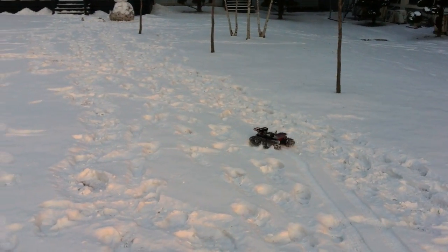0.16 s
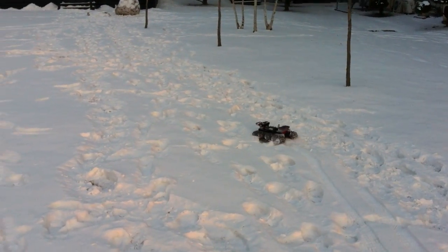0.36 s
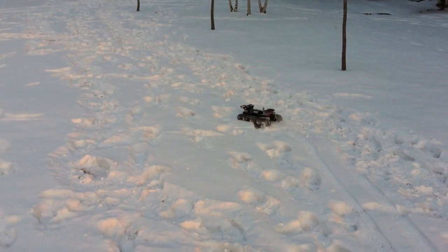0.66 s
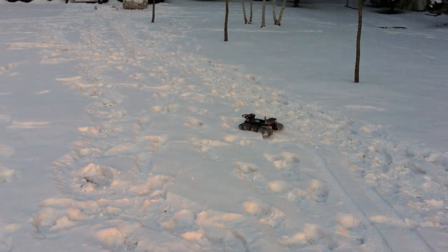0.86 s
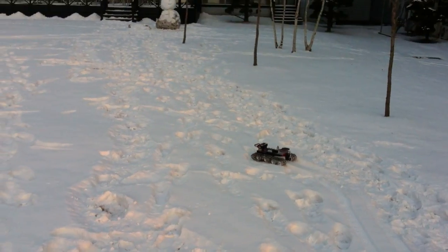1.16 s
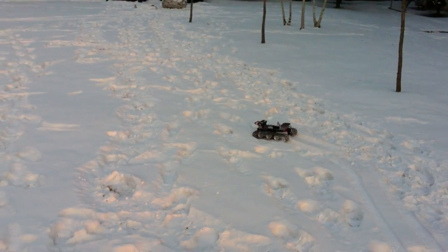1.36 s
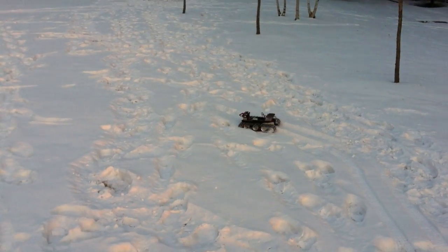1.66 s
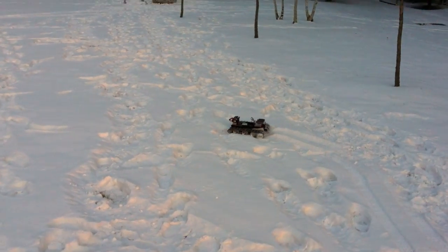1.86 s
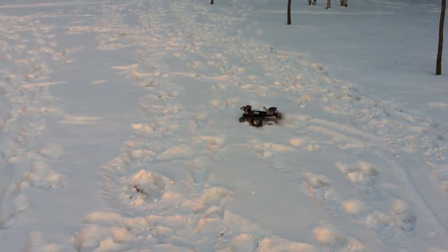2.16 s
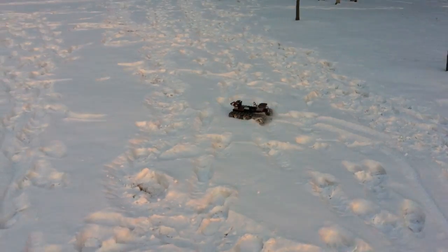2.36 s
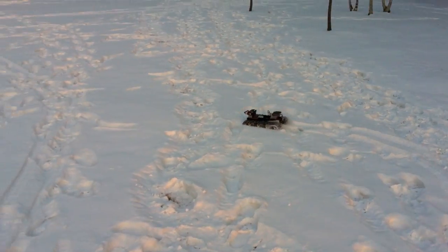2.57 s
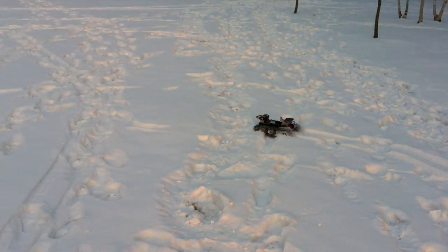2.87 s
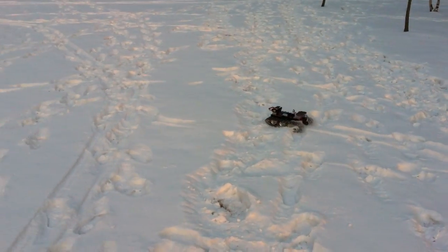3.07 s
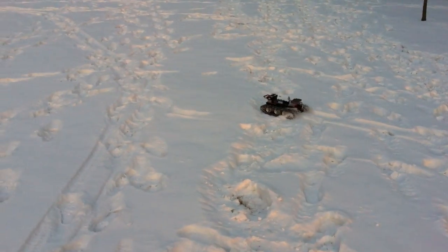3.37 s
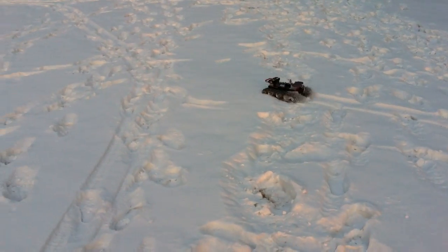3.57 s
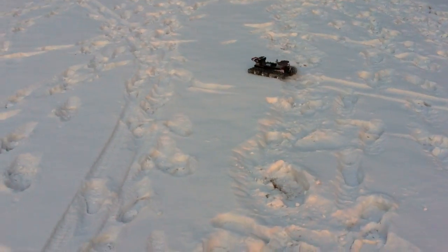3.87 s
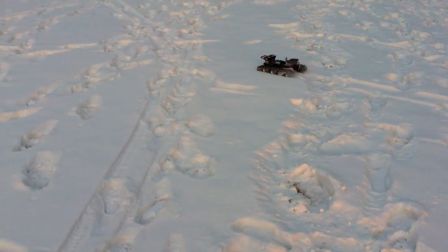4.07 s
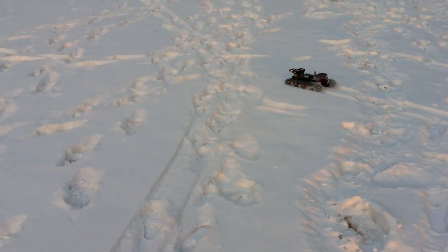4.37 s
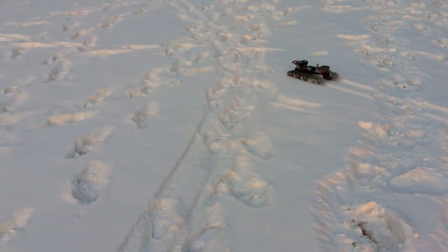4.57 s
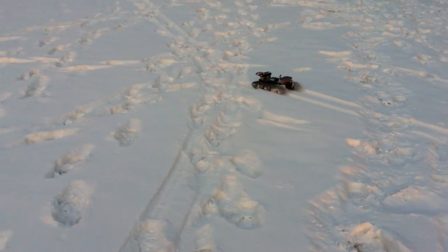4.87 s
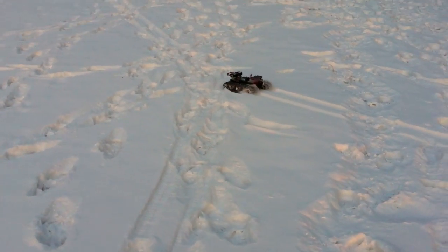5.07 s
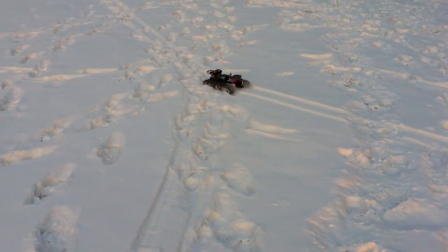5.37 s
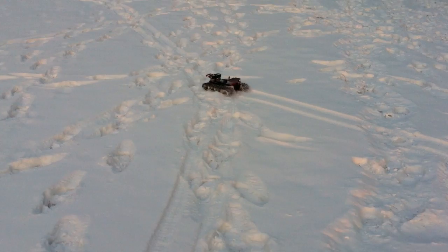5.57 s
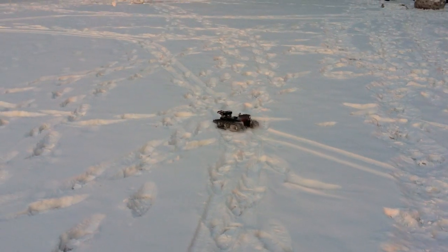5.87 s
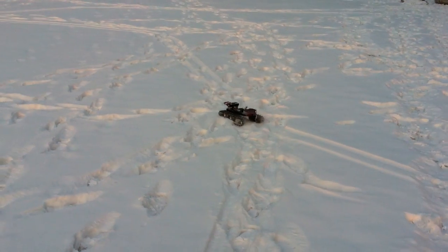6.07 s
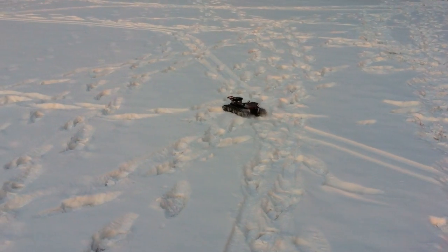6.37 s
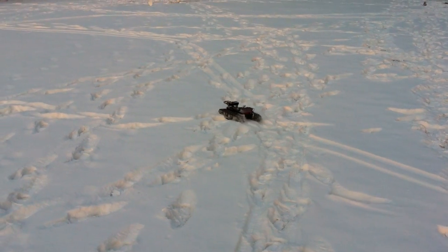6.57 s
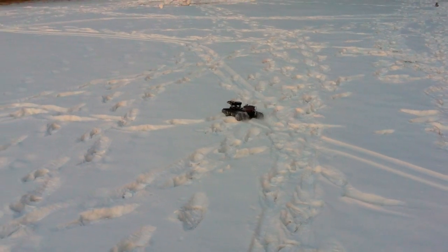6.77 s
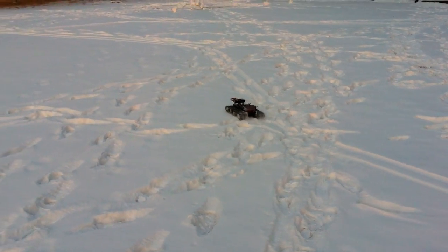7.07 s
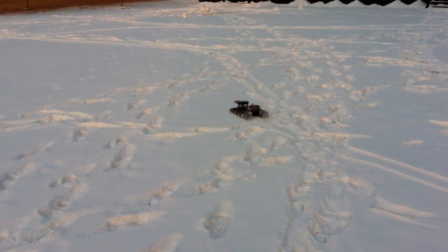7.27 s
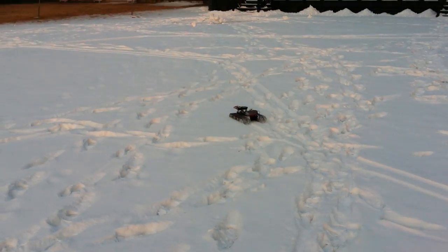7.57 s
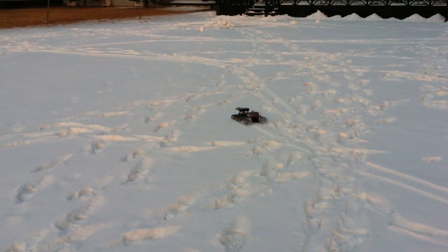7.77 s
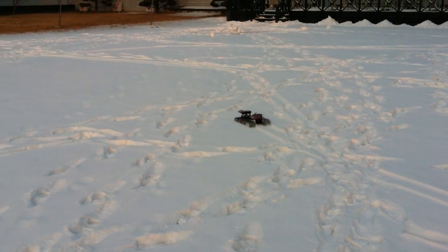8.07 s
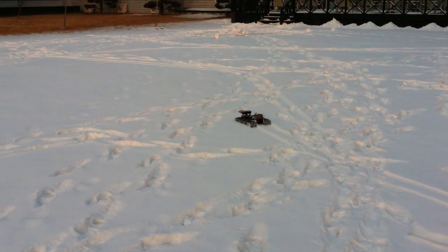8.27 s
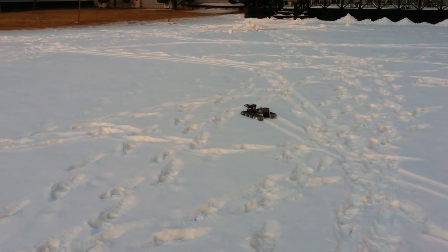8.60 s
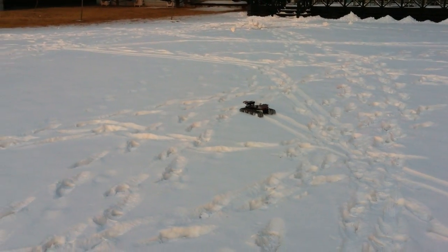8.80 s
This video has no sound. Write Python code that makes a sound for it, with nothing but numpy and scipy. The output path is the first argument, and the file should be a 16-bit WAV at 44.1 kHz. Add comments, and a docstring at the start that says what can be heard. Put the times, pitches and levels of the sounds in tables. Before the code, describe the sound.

A small electric tracked vehicle crawls over softly crunching snow outdoors, its gears whining unevenly and its track links knocking. After about two seconds it speeds up, and the whine climbs and chirps over a chattering plastic rattle. A few short, high squeaks follow, the last as it slows to a crawl again. Light wind rumbles on the microphone, thumping hardest near the end.

```python
"""A small electric tracked vehicle crawls over crunching snow in light wind, its links knocking and its gear
mesh whining at a pitch that dips with each snag. At about 2 s it races: the whine climbs and chirps as the
links drag on the motor, loose teeth chatter, and impacts excite the modes of the plastic housing.
From 4.5 s come short high squeaks, the last a screech as it slows at 8 s. It crawls on, while eddies
buffet the microphone at their strongest."""
import sys
import numpy as np
from scipy import signal
from scipy.fft import rfft, irfft
from scipy.io import wavfile
from scipy.ndimage import uniform_filter1d, map_coordinates

SR = 44100
rng = np.random.default_rng(int(sys.argv[2]) if len(sys.argv) > 2 else 0)


def waveform_to_disk(signal):
    """Save audio, clipped to [-1, 1], as 16-bit WAV at the path in sys.argv[1]."""
    frames = np.transpose(np.atleast_2d(signal))
    scaled = np.clip(frames, -1, 1) * 32767
    samples = np.round(scaled).astype(np.int16)
    wavfile.write(sys.argv[1], SR, samples)


N = 394254
TIME = np.arange(N) / SR
RACE_START_S, RACE_END_S = 2.12, 8.05


def undb(db):
    """Amplitude ratio of a level in decibels."""
    return np.exp(np.asarray(db) * (np.log(10) / 20))


def unit(x):
    """Normalisation to rms 1."""
    return x / np.sqrt(np.mean(x ** 2))


def curves(rows):
    """Linear interpolation of each column of a table in time."""
    s, *columns = np.transpose(rows)
    return [np.interp(TIME, s, c) for c in columns]


def walk(rate):
    """Smooth random modulation of rms 1 that changes about rate times a second."""
    k = max(int(SR / rate), 2)
    steps = np.repeat(rng.standard_normal(N // k + 1), k)
    return unit(uniform_filter1d(uniform_filter1d(steps, k), k)[:N])


def turns(hz):
    """Phase in radians, the time integral of frequency."""
    return 2 * np.pi * np.cumsum(hz) / SR


def around(s, reach_s):
    """The samples within reach of a moment."""
    return slice(max(int((s - reach_s) * SR), 0), int((s + reach_s) * SR))


def bell(s, width_s):
    """Gaussian envelope that peaks at time s and falls to 1/e at width_s on either side."""
    out, near = np.zeros(N), around(s, 4 * width_s)
    out[near] = np.exp(-((TIME[near] - s) / width_s) ** 2)
    return out


def swells(rows, width_s):
    """Sum of Gaussian envelopes, one for each row of t/s, level/dB."""
    return sum(undb(db) * bell(s, width_s) for s, db in rows)


def impacts(rate, scatter_db):
    """Poisson process: rate impulses a second, of log-normal size."""
    struck = np.flatnonzero(rng.random(N) < rate / SR)
    sign, size = rng.standard_normal((len(struck), 2)).T
    return np.bincount(struck, np.sign(sign) * undb(scatter_db * size), N)


def ring(x, hz, width):
    """Two equal resonators in cascade, for steep skirts; rms 1."""
    b, a = signal.iirpeak(hz, hz / width, fs=SR)
    return unit(signal.lfilter(b, a, signal.lfilter(b, a, x)))


def moving_band(x, phase, width_hz, order=2):
    """Heterodyne band-pass whose centre follows a phase; gain 1/2 at the centre."""
    carrier = np.exp(1j * phase)
    lowpass = signal.butter(order, width_hz / 2, fs=SR, output="sos")
    return np.real(signal.sosfilt(lowpass, x / carrier) * carrier)


def colour(x, points):
    """Spectral shaping by points of f/Hz, level/dB; rms 1."""
    hz, db = np.transpose(points)
    bins = np.maximum(np.arange(N // 2 + 1) * SR / N, 1)
    return unit(irfft(rfft(x) * undb(np.interp(np.log(bins), np.log(hz), db)), N))


# steady outdoor air: t/s, level/dB
AIR_LEVEL = [(0, -60.5), (.8, -62.5), (1.15, -58), (1.5, -63), (2.2, -58.5), (4.5, -59.5), (6.2, -66),
             (6.8, -62), (7.3, -65.5), (8.1, -60), (8.94, -67)]
# its spectrum: f/Hz, level/dB
AIR_SPECTRUM = [(20, -31), (40, 1), (62, -24), (80, -24), (98, -6), (118, 0.5), (160, -1), (240, 1.5),
                (320, -9.5), (450, -21), (1000, -22.5)]
# gusts: t/s, duration/s, relative level/dB
WIND_GUSTS = [(1.985, 0.078, -52), (3.692, 0.18, -52), (4.121, 0.11, -50.5), (4.497, 0.058, -60),
              (5.118, .45, -57.5), (5.778, 0.2, -51), (7.802, 0.037, -58), (8.38, 0.22, -53.5),
              (8.733, 0.11, -52.5)]
# single eddies: t/s, peak level/dB, f/Hz
EDDIES = [(5.165, -38, 128.5), (5.328, -36.5, 176), (5.375, -42, 129), (5.591, -39, 166.6),
          (5.928, -35, 162), (7.785, -36, 149.7), (7.815, -37, 169.3), (8.334, -40.5, 168),
          (8.365, -32.5, 165), (8.401, -36, 188.4), (8.46, -31, 130), (8.475, -31, 170),
          (8.545, -38, 161.3), (8.589, -36.5, 213), (8.714, -33.5, 161.5), (8.736, -36.5, 149.5),
          (8.8, -18.5, 237), (8.822, -26.5, 187.6), (8.828, -32, 175.6)]
def wind(gust_rise_s=0.061, gust_fall_s=0.066, eddy_rise_s=0.0022, eddy_fall_s=0.004):
    """Turbulent pressure at the microphone: steady low noise, rumbling gusts and thumping eddies."""
    air_db, = curves(AIR_LEVEL)
    out = colour(rng.standard_normal(N), AIR_SPECTRUM) * undb(air_db + 1.7 * walk(8))
    gusts = np.zeros(N)
    for s, length, db in WIND_GUSTS:
        edges = np.minimum((TIME - s) / gust_rise_s, (s + length - TIME) / gust_fall_s)
        gusts += undb(db) * np.exp(np.minimum(0, edges))
    out += ring(impacts(400, 0.55), 150, 163) * gusts * undb(-2 + 0.45 * walk(25))
    for s, db, hz in EDDIES:
        near = around(s, 1 / 20)
        age = TIME[near] - s
        envelope = np.exp(np.minimum(age / eddy_rise_s, -age / eddy_fall_s))
        out[near] -= undb(db) * envelope * np.cos(2 * np.pi * hz * age)
    return out


# snow under the tracks: t/s, level/dB
CRUNCH_LEVEL = [(0, -54.5), (0.9, -58), (1.5, -56.5), (2.3, -55), (3.4, -52), (4.6, -55.5), (5.5, -56),
                (6.7, -55.5), (7.5, -58), (8.1, -58), (8.94, -61)]
# its spectrum: f/Hz, level/dB
CRUNCH_SPECTRUM = [(190, -12), (330, -2.5), (431, -2), (594, -5), (857, -0.5), (1080, -4.5), (1230, -1),
                   (1380, -2.5), (1450, -2.5), (1880, 0.5), (3190, -120)]
# crushed lumps: t/s, level/dB, half-width/s
SNOW_LUMPS = [(0.114, -54, 0.035), (0.212, -53, 0.023), (0.3, -52, 0.042), (2.314, -54, 0.022),
              (2.696, -53, .03), (2.858, -54, 0.012), (4.338, -50.5, 0.1), (5.177, -55, 0.07),
              (5.913, -53, 0.03), (5.978, -48.5, 0.029), (6.157, -49.5, 0.016)]
def snow():
    """Granular collapse: each grain that yields emits an impulse, and crushed lumps add their power."""
    db, = curves(CRUNCH_LEVEL)
    lumps = sum(undb(lump_db) * bell(s, width_s) for s, lump_db, width_s in SNOW_LUMPS)
    grains = impacts(2500, 1.74) * undb(1.3 * walk(40))
    return colour(grains, CRUNCH_SPECTRUM) * np.hypot(undb(db + walk(9)), lumps)


# the hull meets deeper snow: t/s, level/dB
HULL_SCUFFS = [(0.17, -58), (1.06, -57.5), (1.17, -63), (2.72, -57), (7.15, -61.5)]
def scuffs(hz=418, width_hz=240):
    """Compaction: packed snow yields under the hull in small steps, a soft, low creak."""
    return ring(impacts(350, 2.8), hz, width_hz) * swells(HULL_SCUFFS, width_s=0.068)


# fine snow thrown off the tracks: t/s, level/dB
SPRAY_LEVEL = [(0, -60.5), (0.69, -59), (1.2, -62), (1.7, -66), (2.14, -55.5), (3.5, -56), (6.3, -56.5),
               (8.05, -61), (8.17, -70), (8.3, -58), (8.94, -65)]
# its spectrum: f/Hz, level/dB
SPRAY_SPECTRUM = [(6000, -40), (11000, -10), (11800, -4), (13200, 0), (14200, -0.5), (14900, -3),
                  (15600, -4.5), (17500, -20)]
def spray(load, shaft):
    """Shot noise: thrown snow and the finest ticks of the tracks merge into a pulsing hiss."""
    db, = curves(SPRAY_LEVEL)
    grains = impacts(9000, 4.6) * undb(shaft + 2 * load + 0.82 * walk(30) + .6 * walk(7))
    return colour(grains, SPRAY_SPECTRUM) * undb(db)


# slaps of the track links: t/s, peak level/dB, f/Hz
LINK_KNOCKS = [(0.296, -42, 900), (0.298, -38, 4500), (0.441, -38, 1293), (0.533, -39, 1132),
               (0.537, -42, 523), (0.538, -45, 3000), (0.7, -40, 863), (1.02, -44.5, 439.7),
               (1.226, -41, 549.4), (2.69, -49, 399.4), (7.744, -37.5, 724)]
def knocks(t60_s=0.019):
    """Impact excitation: a slapping link drives a broad resonance with a fast-decaying burst."""
    out = np.zeros(N)
    age = np.arange(SR // 10) / SR
    for s, db, hz in LINK_KNOCKS:
        slap = rng.standard_normal(len(age)) * undb(-60 * age / t60_s)
        burst = ring(slap, hz, 0.73 * hz)
        start = int(s * SR)
        out[start:start + len(age)] += undb(db) * burst / np.abs(burst).max()
    return out


# short high squeaks, the last a screech as the vehicle slows: t/s, level/dB, f/Hz
HIGH_SQUEAKS = [(4.52, -53, 6200), (4.57, -56, 6170), (5.5, -48, 6170), (5.64, -46, 6100),
                (5.95, -53, 6200), (6.27, -54, 6160), (7.2, -49.5, 6150), (8.04, -52, 8980)]
def squeaks(width_s=0.023, width_hz=450):
    """Narrow-band noise: random impulses drive a high resonance, a rough squeak that swells and fades."""
    out, excitation = np.zeros(N), impacts(1500, 1.1)
    for s, db, hz in HIGH_SQUEAKS:
        near = around(s, 4 * width_s)
        out[near] += ring(excitation[near], hz, width_hz) * undb(db) * bell(s, width_s)[near]
    return out


# rattle of the drive: t/s, body level/dB, treble level/dB
RATTLE_LEVEL = [(0, -58.5, -58), (0.65, -57, -56), (1.3, -57.5, -57), (1.9, -53.5, -58),
                (2.15, -50.5, -53.5), (3.6, -53.5, -50), (4.8, -53.5, -49), (6.3, -54, -50.5),
                (7.3, -56.5, -50.5), (8.05, -56, -51.5), (8.14, -58.5, -58.5), (8.3, -62, -59.5),
                (8.94, -64.5, -61)]
# housing modes: f/Hz, bandwidth/Hz, gain crawling/dB, gain racing broadside/dB, gain racing away/dB
HOUSING_BODY_MODES = [(1753, 633, -0.5, -7.5, -2), (2197, 640, 1, 2.3, -0.8), (2643, 370, 0.7, -4, 0.5),
                      (3480, 540, -2, -3, -8), (3967, 430, -3, -3, -6), (1249, 185, -15, -13.5, -8.5)]
HOUSING_TREBLE_MODES = [(4610, 1440, -2.5, -5.5, -7.5), (5080, 530, -6, -7, -11.5),
                        (5630, 470, -4, -6.5, -10.5), (6150, 540, -3, -3, -6.5), (7100, 2500, -1, -5.5, -7),
                        (9035, 1490, -5, -0.5, -3.5), (9780, 1460, 0, -6.5, -8.5),
                        (12150, 800, -7, -15, -10.5)]
def rattle(tooth_hz, load, shaft, racing, treble_db_per_octave=7):
    """Modal response: dense impacts of gears and tracks ring the housing, pulsing with shaft and load."""
    body_db, treble_db = curves(RATTLE_LEVEL)
    surge_octaves = np.log2(tooth_hz / uniform_filter1d(tooth_hz, size=SR // 3))
    treble_db = treble_db + treble_db_per_octave * surge_octaves
    away = np.interp(TIME, [3.2, 4.1], [0, 1])
    pulsing = undb(2.1 * load + 0.65 * shaft + 0.5 * walk(26) + 0.56 * walk(80))
    out = 0
    for modes, db in ((HOUSING_BODY_MODES, body_db), (HOUSING_TREBLE_MODES, treble_db)):
        shared = impacts(5000, 6.6)
        for hz, width, crawl_db, side_db, away_db in modes:
            strikes = (impacts(5000, 5.4) + 0.4 * shared) * pulsing
            # speed and heading decide which panels radiate to the listener
            mode_db = (1 - racing) * crawl_db + racing * (side_db + (away_db - side_db) * away)
            out = out + ring(strikes, hz, width) * undb(db + mode_db + 0.76 * walk(14))
    return out


def hull_flex(x, shift_s=.0022):
    """Frequency modulation: the hull flexes and its ringing runs early or late, sliding in pitch."""
    return map_coordinates(x, [(TIME + shift_s * walk(6)) * SR], order=2, mode="mirror")


def near_echo(x, delay_s=.00147, drift=.02, echo_db=-14.5):
    """Comb filtering: a close, inverted reflection makes notches that shift as the microphone moves."""
    lag_s = delay_s * (1 + drift * walk(1.5))
    return x - undb(echo_db) * map_coordinates(x, [(TIME - lag_s) * SR], order=3)


# narrow gaps in the spectrum of the rattle: f/Hz, bandwidth/Hz, gain/dB
NOTCHES = [(2920, 210, -7), (4880, 260, -2), (5450, 280, -1), (6760, 290, -2), (11030, 470, -7)]
def drifting_notches(x, drift=.018):
    """Band rejection: narrow, slowly drifting gaps give the rattle a hollow colour."""
    tuning = 1 + drift * walk(2.03)
    for hz, width, db in NOTCHES:
        band = 2 * moving_band(x, turns(hz * tuning), width, order=1)
        x = x - (1 - undb(db)) * band
    return x


# the vehicle leans into its turn: t/s, level/dB
TURN_RASPS = [(2.62, -54.5), (3.1, -56)]
def rasping(load, shaft, hz=4010, width_hz=670):
    """Sliding friction: gears pressed sideways scrape in one resonance, pulsing with shaft and load."""
    strikes = impacts(3700, 3.8) * undb(1.53 * shaft + 3 * load)
    return ring(strikes, hz, width_hz) * swells(TURN_RASPS, width_s=0.25)


# metallic ring of a small gear: t/s, level/dB
GEAR_RING_LEVEL = [(1.9, -80), (2.4, -60), (3.3, -59), (3.9, -66), (5.1, -56), (6.3, -63), (6.9, -60),
                   (7.9, -57.5), (8.2, -59.5)]
def gear_ring(load, shaft, hz=4185, width_hz=300):
    """Resonance: tooth strikes keep a small gear ringing at a wandering pitch, louder under load."""
    db, = curves(GEAR_RING_LEVEL)
    strikes = impacts(1800, 2.6) * undb(0.68 * shaft + 4 * load + 2 * walk(30))
    phase = turns(hz * (1 + 0.021 * walk(14)))
    return undb(db) * unit(moving_band(strikes, phase, width_hz))


# hard catches of the tracks at full speed: t/s, relative groan level/dB, half-width/s
HARD_TUGS = [(2.117, -42, 0.017), (2.18, -51, 0.026), (2.23, -45.0, 0.019), (2.305, -43.5, 0.021),
             (2.416, -47, 0.021), (2.448, -40.5, 0.013), (2.489, -49, 0.017), (2.554, -40.5, 0.021),
             (2.596, -46.5, 0.022), (2.658, -40, 0.02), (2.704, -46, 0.01), (2.736, -46.5, 0.013),
             (2.779, -42.5, 0.013), (2.811, -48.0, 0.025), (2.87, -50.0, 0.014), (2.921, -45.5, 0.022),
             (3.018, -45.0, 0.02), (3.161, -50, 0.019), (3.206, -44.5, 0.013), (3.293, -43, 0.026),
             (3.38, -45.0, 0.012), (3.449, -48, 0.023), (3.528, -48, 0.012), (3.582, -40.5, 0.019),
             (3.638, -41.5, 0.014), (3.672, -50, 0.011), (3.723, -47.0, 0.022), (3.792, -49.5, 0.026),
             (3.884, -47.0, 0.025), (3.95, -49.5, 0.016), (4.0, -43, 0.014), (4.087, -50.0, 0.023),
             (4.137, -50.0, 0.016), (4.17, -48.5, 0.011), (4.205, -50.5, 0.014), (4.338, -45.5, 0.02),
             (4.408, -48.0, 0.021), (4.486, -45, 0.011), (4.558, -50.5, 0.017), (4.63, -51.0, 0.025),
             (4.751, -51, 0.024), (4.807, -48, 0.015), (4.843, -49, 0.026), (4.918, -43, 0.013),
             (5.022, -48.0, 0.019), (5.052, -43.5, 0.017), (5.201, -44.5, 0.019), (5.251, -43.0, 0.011),
             (5.346, -49, 0.012), (5.472, -52, 0.024), (5.56, -49.0, 0.011), (5.604, -50.0, 0.023),
             (5.643, -47.5, 0.025), (5.738, -46.5, 0.014), (5.947, -48, 0.028), (6.072, -53, 0.025),
             (6.185, -50.0, 0.028), (6.274, -46.5, 0.017), (6.379, -45, 0.013), (6.447, -49, 0.023),
             (6.523, -44, 0.018), (6.573, -51, 0.026), (6.609, -49, 0.019), (6.657, -48.0, 0.012),
             (6.742, -56, 0.023), (6.824, -52, 0.015), (6.911, -53, 0.013), (7.034, -47, 0.024),
             (7.089, -49.0, 0.023), (7.183, -51.0, 0.026), (7.301, -54, 0.015), (7.338, -49, 0.012),
             (7.476, -49, 0.015), (7.559, -50.5, 0.014), (7.928, -53.5, 0.026), (7.996, -53, 0.013)]
def tugs(sag_s=0.0242):
    """Transient loading: each catch strains the gears, and the speed sags from above to below its mean."""
    strain, sag = np.zeros(N), np.zeros(N)
    for s, db, width_s in list(HARD_TUGS) + light_tugs():
        near = around(s, 1 / 10)
        age = TIME[near] - s
        strain[near] = np.maximum(strain[near], undb(db) * np.exp(-(age / width_s) ** 2))
        sag[near] += 2 * age / sag_s * np.exp(-(age / sag_s) ** 2)
    return strain, sag


def light_tugs(count=140, per_s=21, jitter_s=0.0083, width_s=.014, first_db=-50, fade_db_per_s=1.5):
    """Quasi-periodic loading: small catches between the hard ones, fading as the vehicle draws away."""
    late, size = rng.standard_normal((count, 2)).T
    elapsed = np.arange(count) / per_s + jitter_s * late
    levels_db = first_db - fade_db_per_s * elapsed + 3 * size
    return [(s, db, width_s) for s, db in zip(RACE_START_S + elapsed, levels_db)
            if s < RACE_END_S and min(abs(s - hard) for hard, *_ in HARD_TUGS) > .7 / per_s]


# a link pulls the whine down in a clear chirp: t/s at mid-chirp, gain/dB
LINK_CHIRPS = [(2.151, 4.5), (2.295, -1), (2.375, -1), (2.45, 3), (2.555, 0), (2.665, 5.5), (2.77, 3),
               (2.865, 1), (3.005, 2.5), (3.085, 3), (3.165, 1), (3.265, 2), (3.52, 4), (3.7, 1), (3.87, 1),
               (4.2, 0), (4.6, 3), (5.5, 0), (6.43, -1), (6.525, -1), (6.605, 1), (6.675, 2), (6.77, 2),
               (6.835, 2), (6.9, 1), (7.03, -1), (7.1, 0), (7.18, 1), (7.265, -1), (7.336, 4.5), (7.42, -3),
               (7.51, 3), (7.6, -2), (7.675, -1), (7.765, 5), (7.84, -2), (7.92, 2), (8.06, 0.5)]
def links(per_s=12, pull_share=.75, chirp_s=.045, between_db=-3):
    """Cyclic loading: links drag on the motor in turn, giving a sawtooth speed swing and a gain in dB."""
    s, db = np.transpose(LINK_CHIRPS)
    links_passed = np.cumsum(np.maximum(np.round(np.diff(s, prepend=s[0]) * per_s), 1))
    cycle = np.interp(TIME, s, links_passed) + pull_share / 2
    pull = -signal.sawtooth(2 * np.pi * cycle, pull_share)
    # no two links pull alike: depth, pitch and strength wander
    swing = pull * (1 + .25 * walk(10)) + .3 * walk(14)
    uneven_db = 1.2 * walk(22)
    clear = np.minimum(sum(bell(at, chirp_s) for at in s), 1)
    return swing, clear * np.interp(TIME, s, db) + (1 - clear) * between_db + uneven_db


# the gears between snags: t/s, tooth rate f/Hz, nominal ring of the loose gears f/Hz
GEAR_RATES = [(0, 1761, 1666), (1.94, 2002, 1550), (1.955, 2262, 1540), (1.97, 2320, 1504),
              (1.985, 2573, 1520), (2.085, 2693, 1527), (2.11, 2953, 1560), (2.25, 3188, 1563),
              (2.9, 3260, 1585), (3.5, 3225, 1550), (4.25, 3267, 1663), (4.65, 3190, 1595),
              (5.18, 3377, 1728), (5.65, 3124, 1568), (6.1, 3267, 1717), (6.78, 3152, 1625),
              (8.025, 3180, 1717), (8.06, 2890, 1707), (8.11, 2596, 1670), (8.27, 2085, 1665)]
# snags while crawling: t/s, lowest tooth rate f/Hz, recovered tooth rate f/Hz, recovery time/s,
# stress gain of the whine/dB, gain of its octave on the way down/dB
TRACK_SNAGS = [(0.035, 1700, 1847, 0.046, 3, 0), (0.115, 1702, 2016, 0.048, -6, 0.5),
               (0.215, 1749, 1795, 0.051, 0, 4), (0.295, 1665, 1877, 0.033, 7, 0),
               (0.36, 1859, 2022, 0.019, -2, 0), (0.49, 1604, 1865, 0.042, 3.5, -0.5),
               (0.575, 1708, 1964, 0.026, -1, 0), (0.672, 1577, 1827, 0.051, 4, -1),
               (0.782, 1590, 1887, 0.051, 1, 1), (0.955, 1614, 1788, 0.04, -11, -4),
               (1.025, 1678, 1947, 0.038, 0, 0), (1.135, 1634, 1872, 0.029, -3, -2),
               (1.25, 1530, 1883, 0.05, 4, -1), (1.43, 1494, 1802, 0.032, -5, -2),
               (1.53, 1617, 2033, 0.04, -1, 1.5), (1.625, 1668, 1822, 0.052, -3, 2),
               (1.742, 1790, 2075, 0.028, 2.5, -0.5), (1.82, 1681, 1840, 0.02, 3, -3),
               (1.916, 1772, 1993, 0.027, 2, -1), (8.355, 1834, 2105, 0.01202, 0, -1),
               (8.44, 1805, 1929, 0.03, 3.5, 4), (8.497, 1830, 2072, 0.021, 1, 1),
               (8.575, 1768, 2075, 0.015, 4, 2.5), (8.622, 1780, 2050, 0.016, -1, -8.5),
               (8.68, 1820, 1875, 0.027, -1, 1.5), (8.77, 1697, 1870, 0.022, 2.5, 1.5),
               (8.818, 1845, 2090, 0.012, -2, 0.5), (8.86, 1856, 1866, .01, -5, 5),
               (8.94, 1696, 1900, 0.033, 2, 1.5)]
def motor(droop_power=1.7):
    """Stick-slip: a snag drags the tooth rate down ever faster, then the track slips and it recovers."""
    course = [(s, hz, 1) for s, hz, _ in GEAR_RATES]
    for s, low_hz, free_hz, spring_s, *_ in TRACK_SNAGS:
        course += [(s, low_hz, droop_power), (s + spring_s, free_hz, 1)]
    s, hz, power = np.transpose(sorted(course))
    knots = np.arange(len(s))
    leg, part = np.divmod(np.interp(TIME, s, knots), 1)
    next_knot = np.minimum(leg.astype(int) + 1, len(s) - 1)
    return np.interp(leg + part ** power[next_knot], knots, hz)


def stress(width_s=0.015, lead_s=0.014):
    """Contact force: snags press the teeth together; gains in dB of the fundamental and the octave."""
    s, *_, stress_db, octave_db = np.transpose(TRACK_SNAGS)
    pressed_db = sum(db * bell(at - lead_s, width_s) for at, db in zip(s, stress_db))
    next_snag = np.minimum(np.searchsorted(s, TIME), len(s) - 1)
    return np.array([pressed_db, uniform_filter1d(octave_db[next_snag], size=SR // 200)])


def slack(tooth_hz, unloaded_db=-10.5, full_hz_per_s=9000):
    """Unloading: the teeth fall quiet while the motor gains speed; a gain in dB."""
    acceleration = uniform_filter1d(np.gradient(tooth_hz) * SR, size=SR // 200)
    return unloaded_db * np.clip(acceleration / full_hz_per_s, 0, 1) ** 2


# chatter of the gearbox: t/s, relative level/dB
CHATTER_LEVEL = [(2.06, -50), (2.11, -47), (3.6, -47.5), (4.3, -55), (5.1, -50.5), (5.9, -56), (6.5, -52),
                 (8.0, -51.5), (8.25, -89)]
def chatter(strain, sag, shaft, swing):
    """Backlash: loose teeth keep the gearbox ringing; a tug adds a rough, falling groan at that pitch."""
    db, = curves(CHATTER_LEVEL)
    _, ring_hz = curves(GEAR_RATES)
    phase = turns(ring_hz * (1.008 - 0.031 * sag + .02 * swing))
    groan = np.sin(phase + .4 * walk(400) + .5 * walk(90)) * undb(1.5 * shaft + .8 * walk(80))
    strikes = impacts(2500, 2) * undb(2 * shaft + 2.1 * walk(60))
    ringing = unit(moving_band(strikes, phase, width_hz=150))
    return undb(db - 5.5) * ringing + undb(-0.5) * strain * unit(groan)


# response of the housing to a gear tone: f/Hz, gain/dB
HOUSING_RESPONSE = [(1450, 1), (1570, 1.5), (1700, 1.5), (1790, -3), (1870, -4), (2050, -8.5), (2300, 3),
                    (2650, -7), (2950, -10), (3150, -11.5), (3420, -8.5), (3600, -1.5), (3800, -1.5),
                    (4050, 2), (4250, -9.5), (4800, -22), (6200, -6.5)]
def radiated(hz):
    """Radiation efficiency: the gain in dB that the housing gives a tone of this frequency."""
    points_hz, db = np.transpose(HOUSING_RESPONSE)
    return np.interp(np.log(hz), np.log(points_hz), db)


# gear tones before the housing: t/s, fundamental level/dB, octave level/dB
WHINE_LEVEL = [(0, -46.5, -50), (1.1, -45, -50.5), (1.3, -43.5, -44), (1.48, -37, -43), (1.9, -37.5, -35.5),
               (2.08, -32, -46), (2.1, -48, -47), (2.22, -45, -45), (2.3, -42, -54), (3.1, -40.5, -55),
               (4.3, -43.5, -60), (5.6, -43.5, -52), (6.2, -40, -52), (6.75, -42.5, -54), (7.3, -42, -53),
               (8.0, -46, -49), (8.04, -38, -44), (8.11, -46, -48), (8.135, -61, -58), (8.17, -63, -62),
               (8.245, -70, -58), (8.265, -50, -40.5), (8.4, -49, -46.5), (8.94, -46, -50.5)]
# play in the teeth, from clean squeal to rasp: t/s, roughness (1 = ordinary)
TOOTH_PLAY = [(0, 1.35), (1.1, 1), (1.5, .8), (2.05, .7), (2.2, 1.1), (7.9, 1.1), (8.05, .6), (8.26, .85),
              (8.94, .8)]
def whine(tooth_hz, racing, shaft, chirp_db, stage_ratio=4):
    """Gear meshing: harmonics of the tooth rate, modulated by tooth play and shaft wobble."""
    first_db, octave_db = curves(WHINE_LEVEL) + slack(tooth_hz) + stress()
    rough, = curves(TOOTH_PLAY)
    jitter = (.008 + .009 * racing) * walk(900)
    mesh = turns(tooth_hz * (1 + jitter + .005 * rough * shaft))
    flutter_db = 1.7 * walk(150) + .8 * shaft
    rasp = rough * (.45 * walk(700) + .35 * walk(220))
    first_db += chirp_db + radiated(tooth_hz) + flutter_db
    octave_db += radiated(2 * tooth_hz) + 0.8 * flutter_db + 2 * rough * walk(200)
    first = undb(first_db) * np.sin(mesh + racing * rasp)
    octave = undb(octave_db) * np.sin(2 * mesh + rasp)
    far_db = -6.5 * TIME / TIME[-1]  # faint partials fade as the vehicle draws away
    # the third harmonic shows only as it sweeps through two panel resonances
    panels = sum(1 / (1 + ((3 * tooth_hz - hz) / 150) ** 2) for hz in (5070, 6120))
    third = undb(-50.5 + far_db - 5 * racing + 2 * walk(120)) * panels * np.sin(3 * mesh + rasp / 2)
    # the next gear stage meshes more slowly and buzzes faintly
    slow_stage = undb(-70 + 6.6 * walk(60)) * np.sin(mesh / stage_ratio + 1.7 * walk(200))
    # alternate teeth meet unevenly: while crawling, one panel radiates a tone between the harmonics
    side_panel = 1 / np.hypot(1, (1.5 * tooth_hz - 2650) / 190)
    side = undb(-55 + far_db + 3.6 * walk(90)) * side_panel * (1 - racing) * np.sin(1.5 * mesh + rasp)
    return first + octave + third + slow_stage + side


def scene(shaft_teeth=43, tug_drag=.004, link_drag=.027, speed_up_s=0.11, slow_down_s=0.203):
    """Superposition: gears and tracks, driven by one motor speed and load, sound over snow and wind."""
    tooth_hz = motor()
    ramp_s = [RACE_START_S - speed_up_s, RACE_START_S, RACE_END_S, RACE_END_S + slow_down_s]
    racing = np.interp(TIME, ramp_s, [0, 1, 1, 0])
    strain, sag = tugs()
    load = strain / strain.max()
    shaft = np.sin(turns(tooth_hz / shaft_teeth))
    swing, chirp_db = links()
    tooth_hz = tooth_hz * (1 - tug_drag * sag + link_drag * racing * swing)
    gears = whine(tooth_hz, racing, shaft, racing * chirp_db) + chatter(strain, sag, shaft, swing)
    scrape = rasping(load, shaft) + gear_ring(load, shaft)
    clatter = hull_flex(rattle(tooth_hz, load, shaft, racing)) + squeaks() + spray(load, shaft)
    clatter *= undb(0.55 * walk(8) + 1.1 * walk(130))  # all three flutter as one
    vehicle = gears + drifting_notches(scrape + near_echo(clatter))
    return (vehicle + snow() + scuffs() + knocks() + wind())[None]


def record(dry):
    """Band limiting: a small microphone passes little bass and cuts off steeply at the top."""
    low_hz, top_hz = 66, 15800
    thin = signal.sosfilt(signal.butter(4, low_hz, "high", fs=SR, output="sos"), dry)
    return signal.sosfilt(signal.ellip(10, .2, 70, top_hz, fs=SR, output="sos"), thin)


dry = scene()
out = record(dry)
waveform_to_disk(out)
```